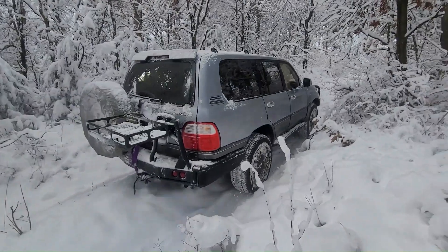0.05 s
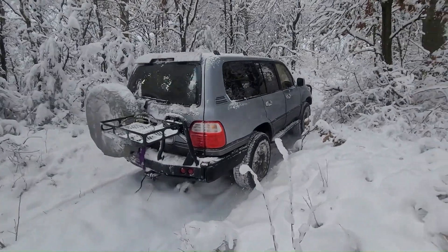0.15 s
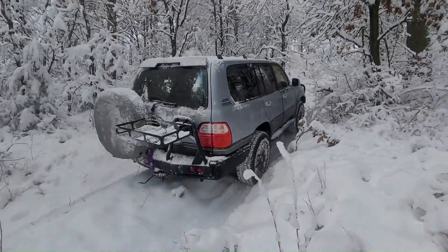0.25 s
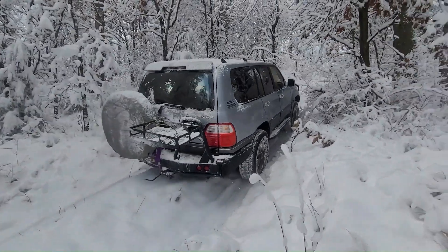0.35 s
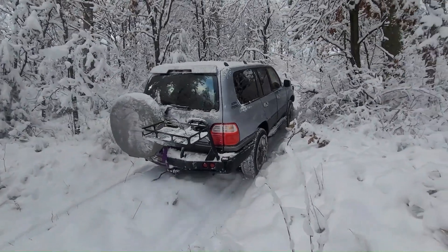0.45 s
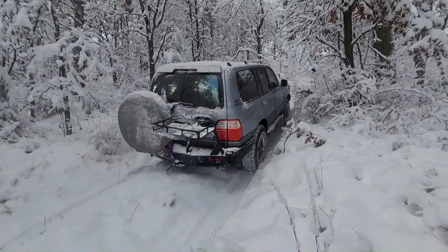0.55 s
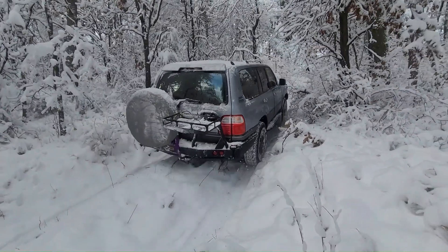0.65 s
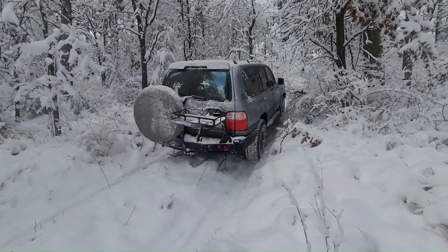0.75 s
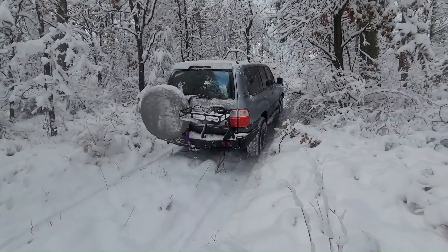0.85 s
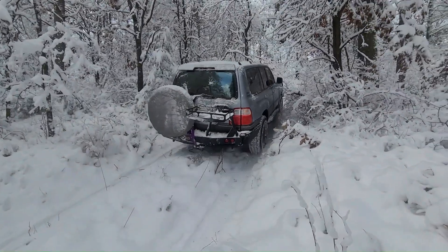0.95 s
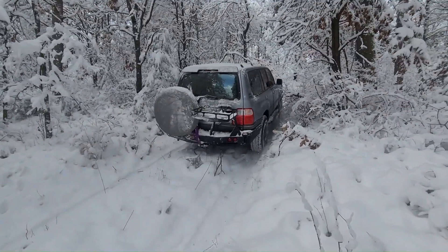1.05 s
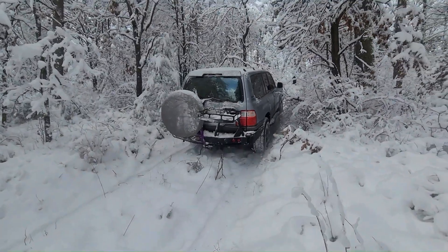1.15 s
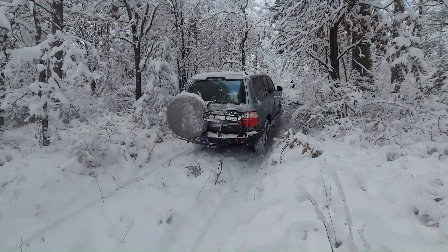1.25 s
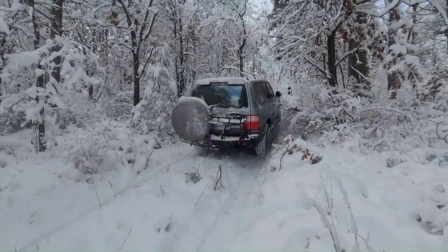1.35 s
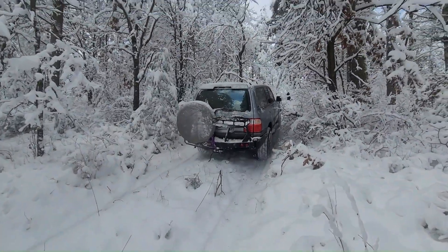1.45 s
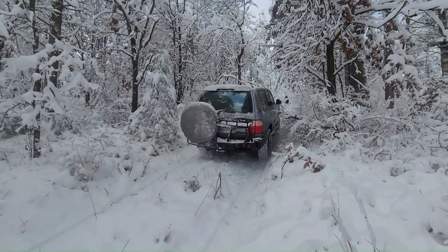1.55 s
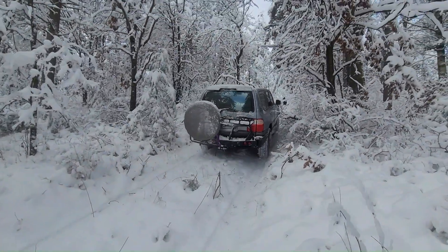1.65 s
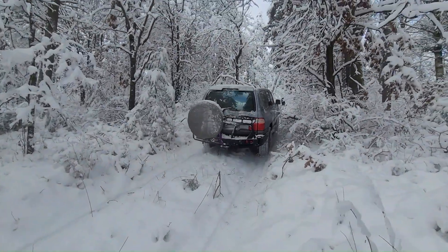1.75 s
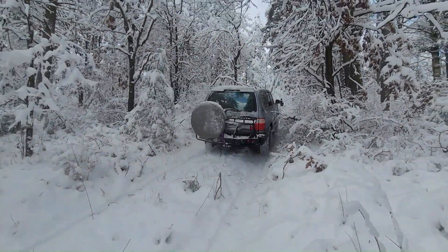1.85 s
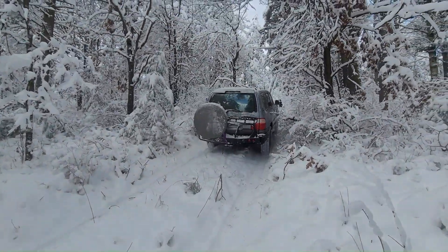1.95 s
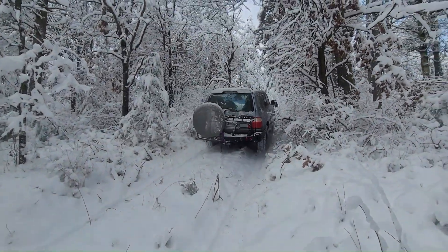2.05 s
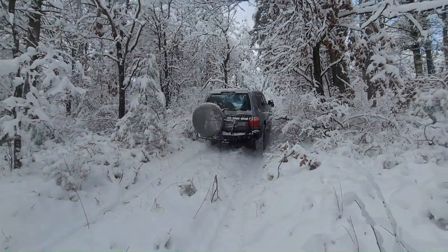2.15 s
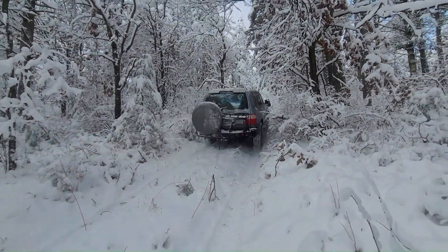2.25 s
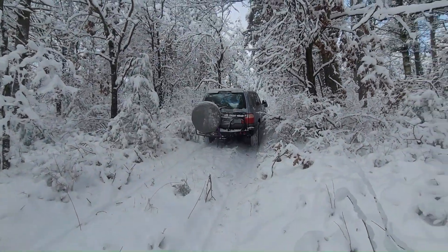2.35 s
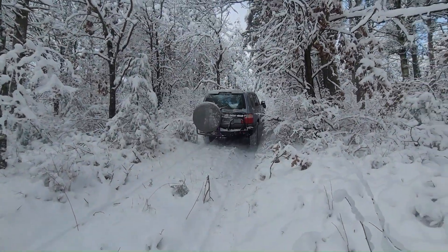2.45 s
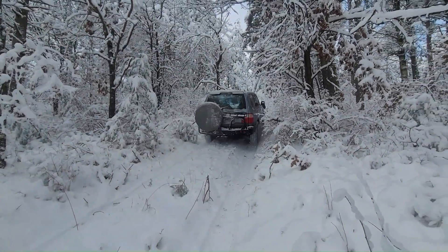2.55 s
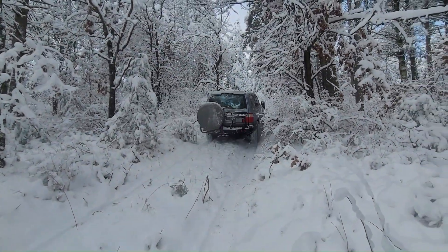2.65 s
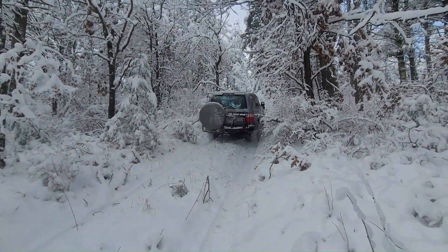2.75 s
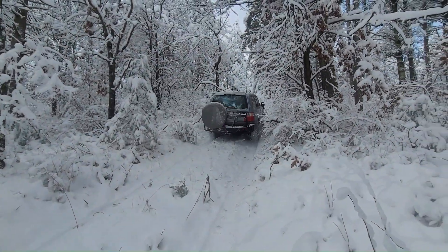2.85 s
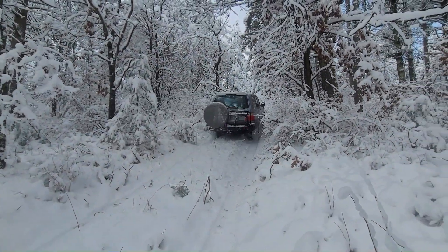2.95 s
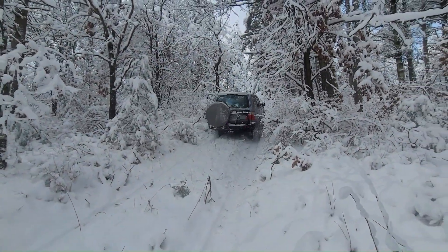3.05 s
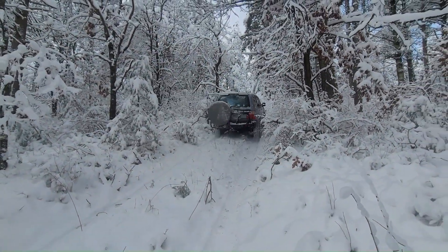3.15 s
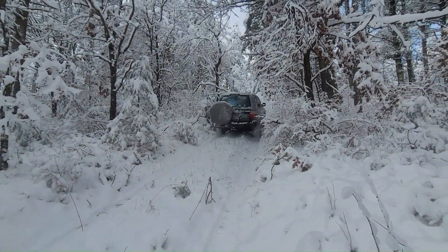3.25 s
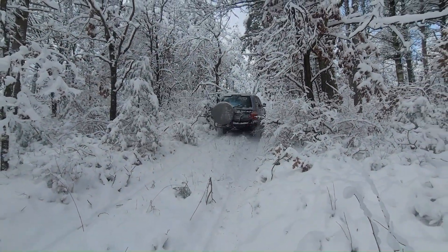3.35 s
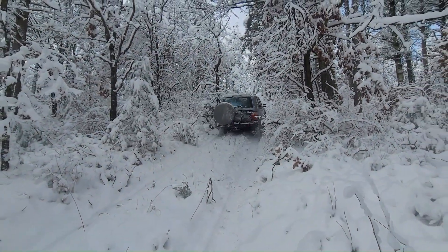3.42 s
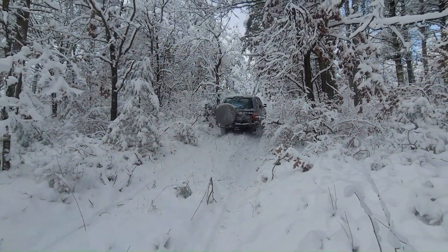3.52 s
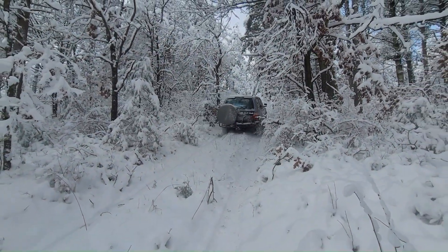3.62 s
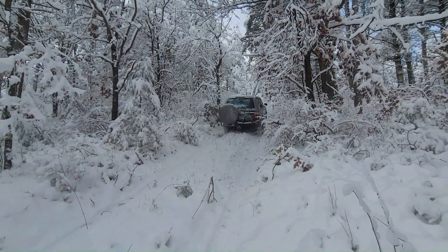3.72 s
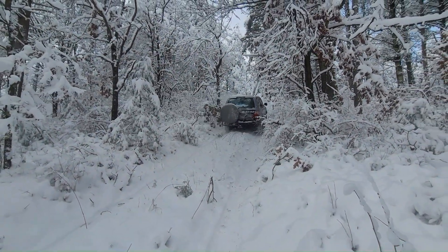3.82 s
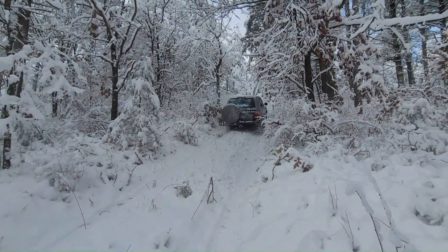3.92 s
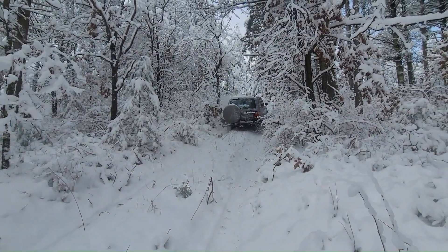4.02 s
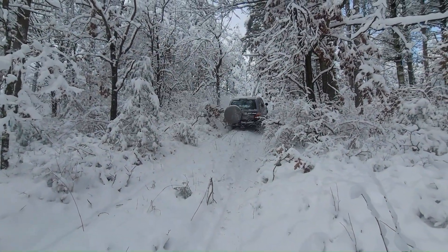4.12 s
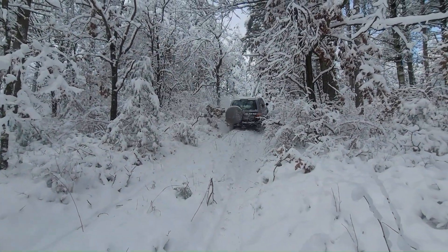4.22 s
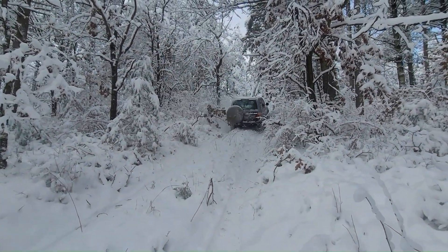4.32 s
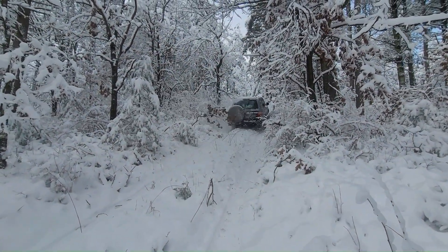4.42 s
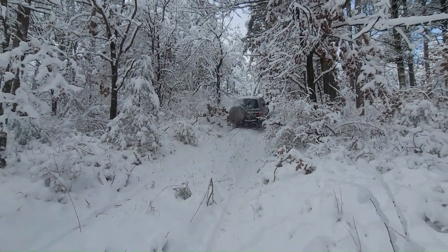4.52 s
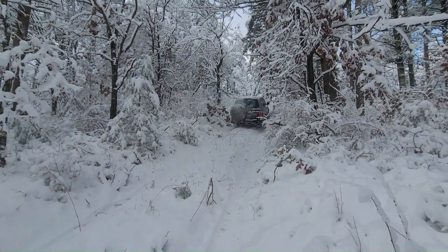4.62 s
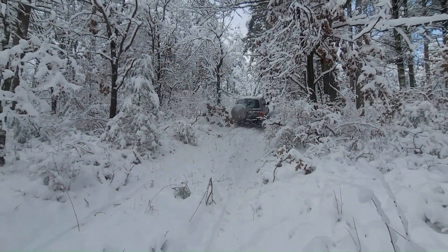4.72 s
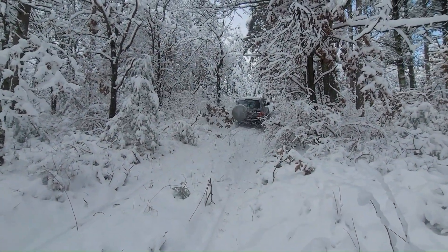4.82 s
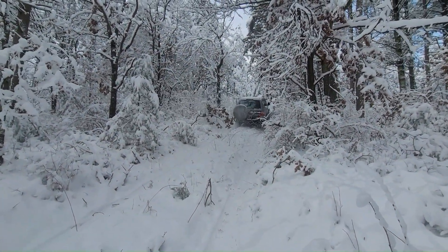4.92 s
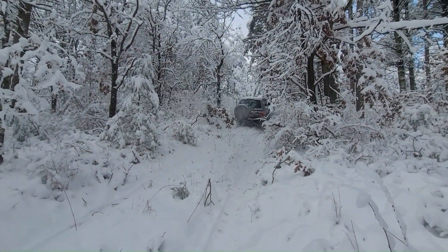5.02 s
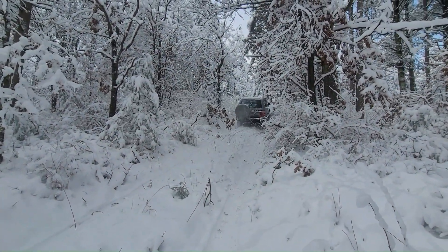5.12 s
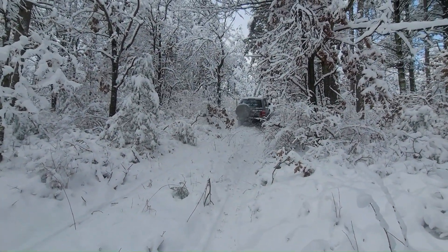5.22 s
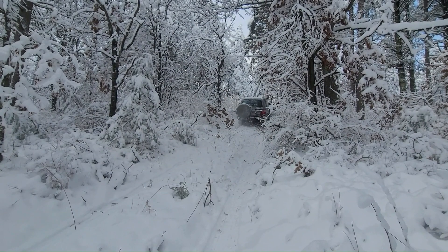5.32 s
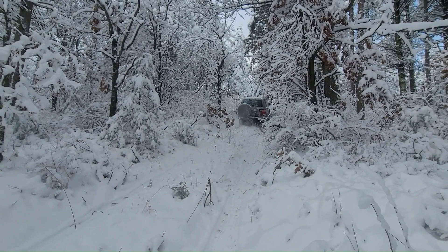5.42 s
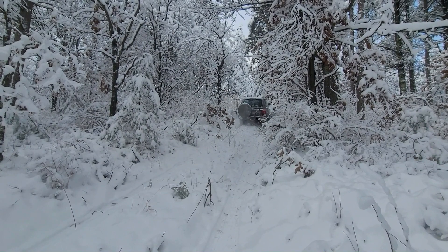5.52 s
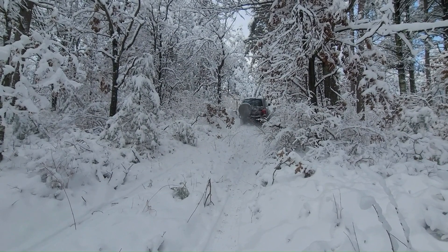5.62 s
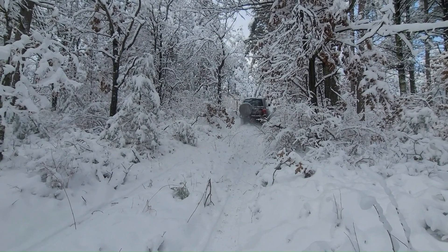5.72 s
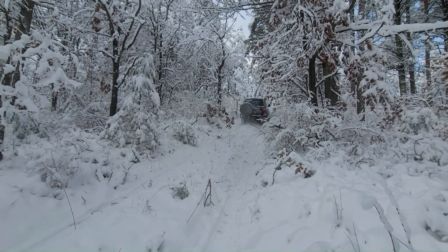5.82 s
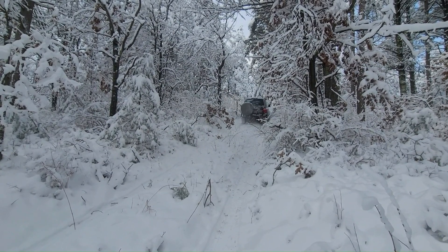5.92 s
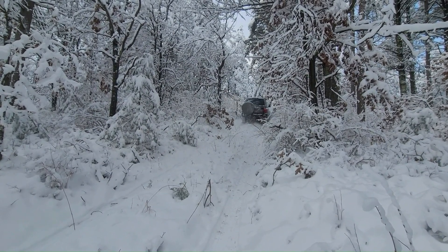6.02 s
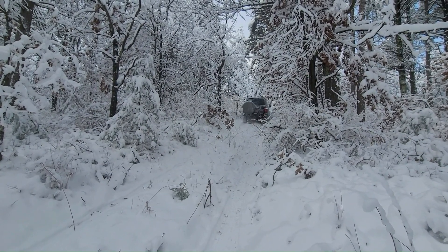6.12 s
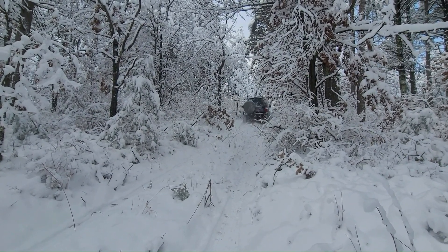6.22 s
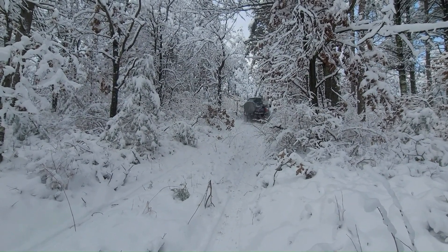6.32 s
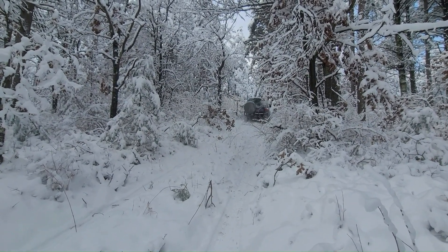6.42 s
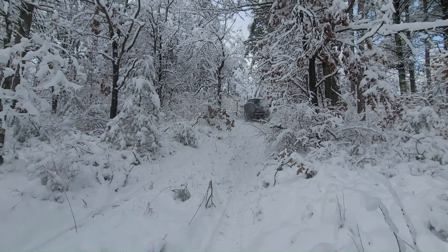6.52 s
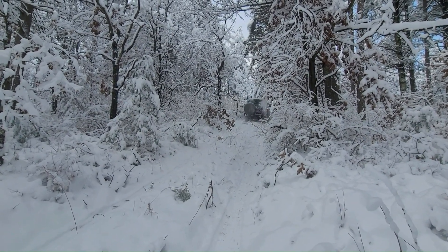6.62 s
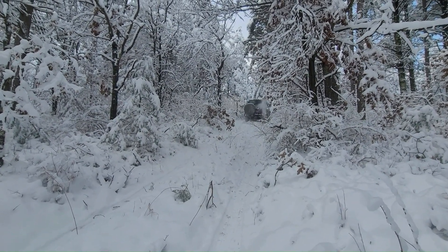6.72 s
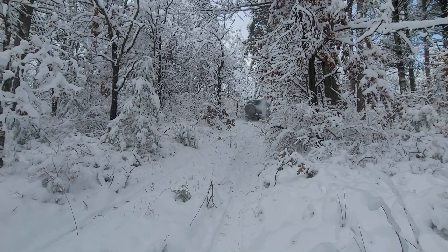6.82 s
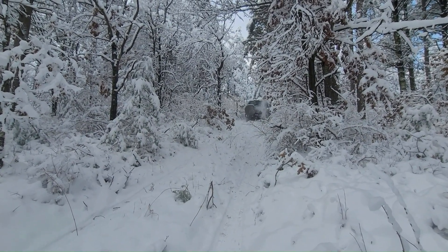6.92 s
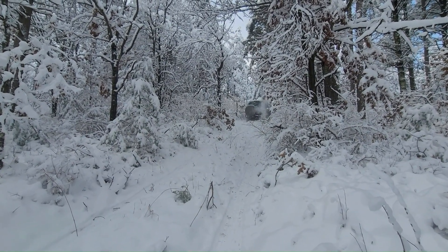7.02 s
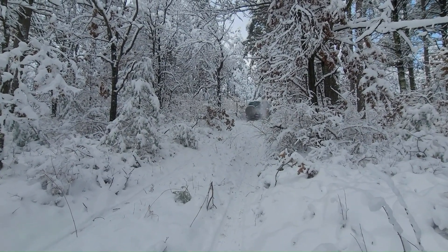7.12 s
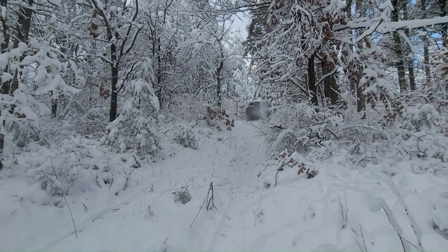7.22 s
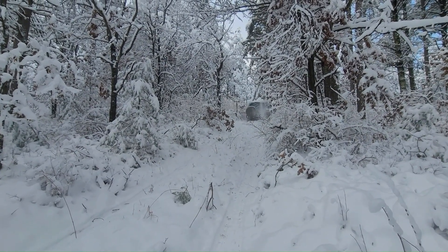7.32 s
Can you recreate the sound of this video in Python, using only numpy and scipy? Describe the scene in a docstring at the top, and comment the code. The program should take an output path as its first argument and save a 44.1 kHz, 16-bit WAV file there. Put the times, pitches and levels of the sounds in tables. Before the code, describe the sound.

A heavy truck crawls away along a snowy forest trail, its steady low exhaust drone beneath dull packing, gritty crunching and cold squeaks of snow. Twigs snap and branches crack, a limb breaks at mid-distance, suspension clunks, and one very sharp snap stands out. Later, cloth rustles close to the outdoor stereo microphone; the tyre noise drops abruptly, leaving a weak, wavering engine and faint wood knocks.

```python
"""A V8 truck crawls away along a snowy forest trail at about 1500 rpm, its exhaust droning in sine lines. Close
by at first, its tyres pack and crunch the snow: coloured noise gated by many tiny fractures. Branches, a limb,
a stick and twigs break as noise bursts and ringing modes, echoed by the trunks. From 4.25 s cloth rustles close
to the microphone; at 5.55 s the tyre noise drops abruptly and then fades, and the drone grows weak and
wavering."""
import sys
import numpy as np
from scipy import signal
from scipy.fft import rfft, irfft, next_fast_len
from scipy.io import wavfile

SR = 44100
rng = np.random.default_rng(int(sys.argv[2]) if len(sys.argv) > 2 else 0)


def wrap_up_sound(samples):
    """Save the sound to the file named by the first command line argument, as 16-bit audio."""
    columns = np.atleast_2d(samples).T
    # keep every value between -1 and 1, then stretch to whole-number steps
    tamed = np.clip(columns, -1, 1)
    steps = np.round(tamed * 32767).astype(np.int16)
    wavfile.write(sys.argv[1], SR, steps)


N = 325040
TIME = np.arange(N) / SR

# Event and colour levels are relative: the functions below add their own offsets.
# engine speed: (t/s, four-stroke cycles per s)
SPEED = [(0, 11.66), (0.8, 11.91), (1.25, 12.43), (2.6, 12.46), (3.85, 12.3), (4.15, 12.45), (4.45, 12.18),
         (5.1, 12.42), (5.7, 13.02), (7.37, 13.12)]
# exhaust drone, 5th multiple of the cycle rate: (t/s, level/dB)
DRONE = [(0, -43), (0.5, -42), (0.9, -46), (1.75, -46), (2.15, -37.5), (3.85, -36.5), (4.15, -39),
         (5.5, -42), (5.6, -45), (6.1, -49.5), (7.37, -51.5)]
# firing line, 8th multiple, swelling with each push on the throttle: (t/s, level/dB)
FIRING = [(0, -62), (0.3, -47.5), (0.98, -40.5), (1.8, -46.5), (2.4, -36), (3.4, -41), (4.15, -43),
          (4.75, -38.5), (5.7, -52.5), (7.37, -59.5)]
# weaker exhaust lines: (multiple of the cycle rate, level/dB against their shared level)
OVERTONES = [(4, -3), (6, -6.5), (11, -4), (13, -14), (16, -10), (19, -16.5)]
# shared level of the weaker lines: (t/s, level/dB)
OVERTONE_LEVEL = [(0, -52.5), (0.9, -48.5), (1.35, -44), (2, -51.5), (3.2, -53), (3.8, -47.5), (4.5, -46.5),
                  (5.45, -48.5), (5.7, -69), (7.37, -85)]
# rumble swelling as the truck heaves over bumps: (t/s, rise/s, fall/s, level/dB)
BUMPS = [(1.31, .08, 0.18, -40), (2.05, 0.092, 0.092, -41), (2.98, 0.49, 0.11, -36.5),
         (3.84, 0.03, 0.029, -33.5), (5.35, 0.022, 0.14, -32.5), (7.24, 0.081, 0.055, -49)]
# suspension clunks in the ruts: (t/s, level/dB)
CLUNKS = [(2.519, -32), (3.0825, -32.5), (3.185, -31.5), (3.211, -36), (3.5355, -28.5), (4.49, -37)]
# modes of the axle: (f/Hz, level/dB, t60/s)
AXLE_MODES = [(462, -6, 0.024), (700, -0.5, 0.02), (1210, -17, 0.012)]
# rolling tyres, bogging in and then receding: (t/s, level/dB)
TYRES = [(0, -0.5), (0.5, -1), (1, 0.5), (2.55, -0.5), (3.3, -3), (4, -7), (4.8, -9), (5.5, -9.5)]
# drive train labouring, up the slope and then in short pushes: (t/s, rise/s, fall/s, level/dB)
PUSHES = [(2.56, 0.13, 0.78, -42), (3.56, .03, 0.14, -45), (4.11, 0.021, 0.036, -58),
          (4.36, 0.12, 0.032, -47)]
# swells of crunching and rustling: (t/s, rise/s, fall/s, crunch level/dB, crackle level/dB, powder level/dB)
SWELLS = [(0.73, 0.074, 0.17, -49, -52.5, -63), (1.03, 0.13, 0.53, -48, -52, -65),
          (2.66, 0.025, 0.029, -45, -70, -75), (2.85, 0.23, 0.08, -80, -59, -56.5),
          (3.53, 0.19, 0.21, -68.5, -68, -67), (4.1, 0.099, 0.14, -58.5, -62, -85),
          (4.46, 0.028, 0.16, -55, -60.5, -62.5), (4.89, 0.018, 0.05, -46.5, -58.5, -59),
          (5.05, 0.082, 0.092, -48.5, -56, -56.5), (5.535, 0.31, 0.012, -53, -67, -69),
          (6.04, 0.043, 0.077, -63.5, -62, -78), (6.12, 0.05, 0.1, -57, -56.5, -63.5),
          (6.48, 0.06, 0.087, -61, -60.5, -67), (6.75, 0.34, 0.2, -72, -75, -76)]
# packed snow collapsing: (t/s, level/dB, centre f/Hz, t60/s)
THUDS = [(1.27, -39, 684, 0.14), (2.115, -35, 353, 0.2), (2.565, -33.5, 435, 0.16),
         (3.905, -45.5, 830, .24), (4.11, -43.5, 425, 0.19), (4.355, -43, 390, 0.15),
         (6.279, -55, 517, 0.18), (6.339, -49.5, 584, 0.078)]
# single creaks of snow and bending wood: (t/s, level/dB, centre f/Hz, t60/s)
CREAKS = [(0.815, -46, 2380, 0.35), (1.2, -32, 2080, 0.015), (1.4986, -44.5, 3520, 0.13),
          (1.577, -39.5, 3020, 0.05), (1.952, -43, 1950, 0.032), (2.119, -46, 2300, 0.34),
          (2.382, -46, 3900, 0.14), (3.1, -41.5, 2040, 0.022), (3.583, -47.5, 1500, 0.041),
          (6.2455, -48.5, 1600, 0.098), (6.248, -49, 2200, 0.1), (6.2735, -49, 2150, .04),
          (6.33, -52.5, 2350, 0.06)]
# branches and crust breaking:
# (t/s, level/dB, low ring level/dB, splinter level/dB, low ring f/Hz, high ring f/Hz, left-right level/dB)
CRACKS = [(0.3571, -37, 0, -24, 850, 2230, -10), (0.5606, -38, -10, -15, 725, 2170, -4),
          (0.645, -42, 8, -26.5, 1040, 1500, -7), (0.6652, -44, 8, 0, 1255, 2310, -6),
          (0.8594, -35.5, 4, -5, 700, 2377, -1), (1.7269, -34, -2.5, -15, 855, 2780, -7),
          (1.7645, -30.5, 7.5, -13, 865, 2663, -3), (2.263, -33, -9, -22, 604, 1605, -4),
          (2.2822, -32, 7.5, -4, 785, 1500, -1), (2.3844, -39.5, 7, -17, 587, 1553, -5),
          (3.473, -24, -9, -9, 1360, 3200, 1.5), (4.113, -46.5, 14, -13, 807, 2370, -5),
          (5.0564, -42, -3, -11, 820, 2110, -10), (6.4794, -44, -4.5, -1, 794, 2630, -7)]
# modes of a branch: (ratio to its high ring, level/dB)
BRANCH_MODES = [(0.757, -15), (1, 3), (1.327, -4.5), (1.758, -19.5), (2.098, -3)]
# a thick limb giving way under a wheel: (t/s, level/dB, brightest f/Hz, rise/s, left-right level/dB)
LIMB_JERKS = [(2.2805, -34, 7000, 0.0031, -8), (2.288, -32, 2200, 0.0044, -4),
              (2.299, -28, 850, 0.0014, 17.5), (2.311, -38.5, 3500, 0.0018, -5),
              (2.328, -37.5, 1400, 0.004, 1)]
# modes of the limb: (f/Hz, level/dB, t60/s)
LIMB_MODES = [(615, -2, 0.1), (750, -2.5, 0.06), (935, -6, 0.15), (1472, -3, 0.055), (1736, 0, .065),
              (1845, 0, 0.05), (2240, -8, 0.087), (2740, -7, .05), (2985, -6, 0.049), (3300, -7, 0.045),
              (3707, -2.5, 0.1)]
# a dry stick breaking: (t/s, level/dB, brightest f/Hz, rise/s, left-right level/dB)
STICK_JERKS = [(3.3445, -34.5, 5000, 0.0024, -3), (3.3555, -37, 1200, .002, -4)]
# modes of the stick: (f/Hz, level/dB, t60/s)
STICK_MODES = [(860, -3, .04), (1067, -0.5, 0.073), (1357, -12, 0.032), (1640, 1.5, 0.055), (2525, -7, .04),
               (2960, -3.5, 0.038), (4178, -12, 0.073)]
# twigs and ice snapping, and the bright top of the last log knock: (t/s, level/dB, nominal f/Hz, t60/s)
SNAPS = [(0.151, -33, 9160, 0.027), (0.3711, -31.5, 7900, 0.018), (0.7706, -27, 6940, 0.018),
         (0.873, -29.5, 6400, 0.11), (1.0246, -30.5, 14000, 0.032), (2.4738, -34.5, 10100, 0.094),
         (2.9516, -29.5, 6320, 0.016), (3.0121, -36.5, 9930, 0.11), (3.2321, -35, 5940, 0.1),
         (3.345, -31.5, 6940, .06), (3.473, -14, 4600, 0.014), (3.4735, -31, 12740, .02),
         (3.4995, -34, 6000, 0.032), (3.5073, -29.5, 9000, 0.014), (3.586, -35, 9000, 0.038),
         (3.686, -23, 8900, 0.013), (4.865, -30, 10800, 0.05), (4.9416, -35.5, 13000, 0.032),
         (5.0352, -28.5, 11000, 0.061), (7.331, -52, 4900, .15)]
# logs knocking against the truck up the trail: (t/s, level/dB, brightest f/Hz, rise/s, left-right level/dB)
KNOCKS = [(4.863, -40.5, 2700, 0.0013, -9), (4.8705, -39, 1780, 0.00087, -9),
          (5.047, -47, 3000, 0.001, -11), (5.072, -53, 3970, 0.00091, -12),
          (5.5325, -47.5, 2800, 0.00091, -6), (6.274, -55, 2660, 0.00091, -9),
          (6.315, -57, 3570, 0.004, -9), (6.3235, -55.5, 3000, 0.0012, -6),
          (7.3292, -36, 2210, 0.00077, -7), (7.3445, -45, 1100, .001, -4.5), (7.355, -51, 2500, .001, -1)]
# modes of the logs: (f/Hz, level/dB, t60/s)
LOG_MODES = [(750, -2.5, 0.028), (945, -4.5, 0.024), (1245, -3, 0.034), (1702, -3, 0.04),
             (2200, -3.5, 0.04), (2500, -4, .03)]
# spectrum of the exhaust rumble: (f/Hz, relative level/dB)
RUMBLE_COLOUR = [(18, -25), (28, -12), (38, -21), (56, -2), (78, -7), (105, -10.5), (135, -19),
                 (200, -34.5)]
# spectrum of snow packed by the tread: (f/Hz, relative level/dB)
PACKING_COLOUR = [(90, 1), (140, -1.5), (220, -1), (320, -0.5), (430, -5.5), (650, -48)]
# spectrum of the drive train's whir: (f/Hz, relative level/dB)
WHIR_COLOUR = [(300, -12.5), (450, -1), (580, 1), (750, -0.5), (900, -7), (1100, -13.5), (1400, -32),
               (1900, -18.5)]
# spectrum of breaking crust: (f/Hz, relative level/dB)
CRUNCH_COLOUR = [(900, 5), (1250, 4.5), (1600, 0.5), (2300, -0.5), (3100, -4), (3700, -11), (4400, -9)]
# spectrum of ice crackle: (f/Hz, relative level/dB)
CRACKLE_COLOUR = [(3500, 12.5), (4500, 2), (5400, 4.5), (7300, 0.5), (8800, 5.5), (10500, 3)]
# spectrum of sifting powder: (f/Hz, relative level/dB)
POWDER_COLOUR = [(10000, 1.5), (12000, 3.5), (14000, 2), (15800, 2), (17000, -30)]
# spectrum of cloth near the microphone: (f/Hz, relative level/dB)
CLOTH_COLOUR = [(3700, 5.5), (5300, 8), (6700, 0), (8100, 2), (8900, -0.5), (10500, 7.5)]
# diffuse sound at the two microphone ports: (f/Hz, left-right likeness, clipped to -1..1)
LIKENESS = [(30, 0.5), (60, 0.9), (150, 1.8), (300, 0.77), (700, 0.48), (1300, -0.25), (2200, -0.16),
            (4000, -0.16), (14000, 0)]
# diffuse sound at the two microphone ports: (f/Hz, left-right level/dB)
BALANCE = [(30, -2), (100, 3), (600, -2.5), (1300, -5), (2400, -5), (4400, -1.5), (8000, -4), (14000, 1)]

# the 3rd multiple against the drone, and how much lower it starts
THIRD_DB, THIRD_START_DB, THIRD_GROW_S = -3, -13, 1.0
# rumble: early level, change and throb after the drop
RUMBLE_DB, RUMBLE_LATE_DB, RUMBLE_SINK_S, RUMBLE_THROB_DB = -46.5, -9, 0.64, 3.5
# layers that follow the tyres, before the tyres' own level
PACKING_DB, WHIR_DB, CRUNCH_DB, CRACKLE_DB, POWDER_DB = -42, -44, -50, -59.5, -66
PACKING_START_DB, PACKING_GROW_S = -5.5, 0.63  # the packing builds up as the tyres dig in
PACKING_DROP_DB = -3.5  # extra loss of the dull packing after the drop
WHIR_FOLLOWS, TREBLE_FOLLOWS = 0.98, 0.69  # share of the tyres' swing in whir, and in crackle and powder
CRUNCH_LUMPS_DB, CRUNCH_LUMPS_HZ = 1.5, 13.3  # the crust gives way unevenly
DROP_S, DROP_LENGTH_S, DROP_DB, FADE_DB_PER_S = 5.548, 0.006, -11, -3  # abrupt drop, then a steady fade
CRUST_FROM_S, CRUST_LASTS_S, CRUST_T60_S = 0.55, 1.65, 0.031
CRUST_DB, CRUST_SPREAD_DB, CRUST_PAN_DB = -53, 7, -6
CRUST_LOW_HZ, CRUST_OCTAVES, CRUST_DULL_DB = 1284, 2.08, 6  # the highest are this much weaker
CREAK_WIDTH, CREAK_RISE_S, CREAK_PAN_DB = 1.105, 0.0021, -8  # width: band edge as a ratio to the centre
CRACK_RISE_S, CRACK_CYCLES = 0.0042, 56  # lasts a set number of low-ring cycles: thick wood rings longer
SMALL_SNAPS_UNTIL_S, SMALL_SNAP_DB, SMALL_SNAP_DB_PER_S = 0.75, -37.5, -4
SMALL_SNAP_HZ, SMALL_SNAP_T60_S, SNAP_PAN_DB = 9800, 0.024, -2.5
KNOCK_ECHO_DB = 4  # from that far, more of the sound comes by way of the trunks
FOREST_T60_S, FOREST_DB, FOREST_CUT_HZ = 0.12, -15.5, 15000
CUTOFF_HZ = 16100


def from_db(db):
    """Decibels to gain."""
    return 10 ** (np.asarray(db) / 20)


def power_sum(*levels_db):
    """Level in dB of unrelated sounds heard together."""
    return 10 * np.log10(sum(from_db(db) ** 2 for db in levels_db) + 1e-20)


def rms_one(x):
    """Scale to rms 1."""
    return x / np.sqrt(np.mean(x ** 2) + 1e-20)


def in_time(rows):
    """Read a table along time, one curve per column after the first."""
    s, *columns = np.transpose(rows)
    return [np.interp(TIME, s, column) for column in columns]


def at_hz(points, hz):
    """Read a table on a log-frequency axis."""
    f, value = np.transpose(points)
    return np.interp(np.log(hz + 1e-3), np.log(f), value)


def panned(db):
    """Left and right gains for a level difference."""
    return from_db(np.array([[0.5], [-0.5]]) * db)


def add(out, s, sound):
    """Mix a sound in at time s."""
    start = int(np.clip(s * SR, 0, N - 1))
    out[:, start:start + sound.shape[1]] += sound[:, :N - start]


def drift(rate_hz):
    """Slow chance with spread 1: noise at a 40th of the sample rate through two equal poles."""
    pole = np.exp(-80 * np.pi * rate_hz / SR)
    noise = rng.standard_normal(N // 40 + 2002)
    slow = signal.lfilter([1], [1, -2 * pole, pole * pole], noise)[2000:]  # skip the filter's start
    return np.interp(np.arange(N) / 40, np.arange(len(slow)), rms_one(slow))


def surges(rows):
    """Level in dB of events that grow and die exponentially about their peak; one curve per level column."""
    events = []
    for s, rise_s, fall_s, *peaks_db in rows:
        away = np.maximum((s - TIME) / max(rise_s, 0.005), (TIME - s) / max(fall_s, 0.005))
        events.append(np.array(peaks_db)[:, None] - 20 / np.log(10) * np.minimum(away, 20))
    return power_sum(*events)


def since_drop():
    """Seconds since the abrupt drop, zero before."""
    return np.maximum(TIME - DROP_S, 0)


def band(x, low_hz, high_hz, order=2):
    """Causal band-pass."""
    edges = np.clip([low_hz, high_hz], [10, 20], [0.44 * SR, 0.45 * SR])
    return signal.sosfilt(signal.butter(order, edges, "band", fs=SR, output="sos"), x)


def stereo_noise(colour, envelope=1):
    """Noise under an envelope, then coloured and spread over both ports; rms 1."""
    size = next_fast_len(N)
    hz = np.arange(size // 2 + 1) * SR / size
    mid, side = rfft(rng.standard_normal((2, N)) * envelope, size)
    alike = np.clip(at_hz(LIKENESS, hz), -1, 1)
    pair = np.sqrt(1 + alike) * mid + np.sqrt(1 - alike) * side * [[1], [-1]]
    # outside its table the colour falls steeply
    skirts = 1 / (1 + (colour[0][0] / (hz + 1)) ** 4) / (1 + (hz / colour[-1][0]) ** 8)
    spectrum = pair * skirts * from_db(at_hz(colour, hz)) * panned(at_hz(BALANCE, hz))
    return rms_one(irfft(spectrum, size)[:, :N])


def grains(per_s, spread_db, t60, smooth_share):
    """Envelope of many tiny fractures of uneven size, each dying quickly, over a smooth bed."""
    born = rng.random(N) < per_s * from_db(4 * drift(7)) / SR
    energy = born * from_db(spread_db * np.minimum(rng.exponential(1, N), 4)) ** 2
    energy = signal.lfilter([1], [1, -from_db(-120 / (t60 * SR))], energy + 1e-18)
    share = np.clip(smooth_share, 0, 1)
    return np.sqrt(share + (1 - share) * energy / energy.mean())


def swell(t60, rise_s):
    """Envelope of height 1: fibres give way one after another, then the sound dies."""
    t = TIME[:SR // 4]
    shape = (1 - np.exp(-t / max(rise_s, 1e-4))) ** 2 * from_db(-60 * t / max(t60, 0.005))
    return shape / shape.max()


def burst(low_hz, high_hz, t60, rise_s, apart=0.87):
    """A quarter second of noise in one band that swells and dies, partly alike at the two ports."""
    noise = rng.standard_normal((2, SR // 4 + 2000))
    mid, side = band(noise, low_hz, high_hz)[:, 2000:]  # skip the filter's start
    return rms_one(mid + apart * side * [[1], [-1]]) * swell(t60, rise_s)


def ring(hz, t60, rise_s, rough):
    """A struck mode, roughened by noise about its pitch as by tearing fibres."""
    phase = rng.random() + rng.random((2, 1)) / 3  # in cycles, a little apart at the two ports
    tone = np.sin(2 * np.pi * (hz * TIME[:SR // 4] + phase)) * swell(t60, rise_s)
    return tone + rough * burst(hz / 1.257, hz * 1.083, t60, rise_s)


def tearing():
    """Gain of fibres that part one by one, a few milliseconds apart, each with a sharp edge."""
    parts = rng.random(SR // 4) < 450 / SR
    return rms_one(0.5 + 2 * signal.lfilter([1], [1, -0.98], parts))


def exhaust(wobble_db, overtone_wobble_db):
    """Uneven firing of each cylinder bank puts lines at 3 and 5 times the cycle rate, beside the firing line."""
    cycle_hz, = in_time(SPEED)
    fifth_db, = in_time(DRONE)
    firing_db, = in_time(FIRING)
    overtone_db, = in_time(OVERTONE_LEVEL)
    third_db = fifth_db + THIRD_DB + THIRD_START_DB * np.exp(-TIME / THIRD_GROW_S)
    turns = np.cumsum(cycle_hz * (1 + 0.001 * drift(4))) / SR
    far = np.clip((TIME - 5.3) / 0.46, 0, 1)
    out = 0
    for multiple, db in zip((3, 5, 8), (third_db, fifth_db, firing_db)):
        # from 5.3 s the lines grow weaker and waver more
        waver_db = wobble_db * drift(4.1) + far * (3.7 * drift(12.6) - 2)
        out = out + from_db(db + waver_db) * np.sin(2 * np.pi * (multiple * turns + rng.random()))
    for multiple, db in OVERTONES:
        level = from_db(overtone_db + db + overtone_wobble_db * drift(3.5))
        out = out + level * np.sin(2 * np.pi * (multiple * turns + rng.random()))
    return np.sqrt(2) * out * panned(-2.07)


def rumble():
    """Low exhaust noise that swells over bumps, then sinks and throbs after the drop."""
    far = 1 - np.exp(-since_drop() / RUMBLE_SINK_S)
    steady_db = RUMBLE_DB + far * (RUMBLE_LATE_DB + RUMBLE_THROB_DB * drift(11.0))
    return from_db(power_sum(steady_db, surges(BUMPS))) * stereo_noise(RUMBLE_COLOUR)


def suspension(rise_s, rough):
    """The axle drops into a rut and its modes ring in a short hollow clunk."""
    out = np.zeros((2, N))
    for s, db in CLUNKS:
        clunk = sum(from_db(db + mode_db) * ring(hz, t60, rise_s, rough) for hz, mode_db, t60 in AXLE_MODES)
        add(out, s, clunk)
    return out


def rolling_levels():
    """Packing, whir, crunch, crackle and powder in dB: all follow the tyres, with pushes and swells on top."""
    tyres_db, = in_time(TYRES)
    dropped = np.minimum(since_drop() / DROP_LENGTH_S, 1)
    tyres_db = tyres_db + DROP_DB * dropped + FADE_DB_PER_S * since_drop()
    lumps_db = CRUNCH_LUMPS_DB * drift(CRUNCH_LUMPS_HZ) * (1 - dropped)
    crunch_db, crackle_db, powder_db = surges(SWELLS)
    dig_in_db = PACKING_START_DB * np.exp(-TIME / PACKING_GROW_S)
    return (PACKING_DB + tyres_db + dig_in_db + PACKING_DROP_DB * dropped,
            power_sum(WHIR_DB + WHIR_FOLLOWS * tyres_db, surges(PUSHES)),
            power_sum(CRUNCH_DB + tyres_db + lumps_db, crunch_db),
            power_sum(CRACKLE_DB + TREBLE_FOLLOWS * tyres_db + lumps_db, crackle_db),
            power_sum(POWDER_DB + TREBLE_FOLLOWS * tyres_db, powder_db))


def rolling(packing_db, whir_db, crunch_db):
    """Tread blocks squeeze the snow in dull thuds and break its crust in grains; the drive train whirs."""
    packing = stereo_noise(PACKING_COLOUR, grains(per_s=130, spread_db=-1.0, t60=0.072, smooth_share=0.49))
    whir = stereo_noise(WHIR_COLOUR, grains(per_s=240, spread_db=4.0, t60=0.075, smooth_share=0.69))
    crunch = stereo_noise(CRUNCH_COLOUR, grains(per_s=200, spread_db=4.5, t60=0.0056, smooth_share=0.79))
    # single ice grains tick over the crunch
    ticks = stereo_noise(CRUNCH_COLOUR, grains(per_s=330, spread_db=2.5, t60=0.004, smooth_share=0))
    crust_noise = crunch + from_db(-6) * ticks
    return from_db(packing_db) * packing + from_db(whir_db) * whir + from_db(crunch_db) * crust_noise


def squeaks(count, spread_db, t60):
    """Cold snow creaks under the tread in many overlapping grains, each at another pitch."""
    out = np.zeros((2, N))
    for when, pitch, size in rng.random((count, 3)):
        hz = 950 * 3.7 ** pitch
        squeak = burst(hz / 1.06, hz * 1.06, t60, rise_s=0.004, apart=1)
        add(out, when * N / SR, from_db(spread_db * size - 5 * pitch) * squeak)
    return rms_one(out) * panned(-1.17) * from_db(-0.8 * TIME)


def crust(count):
    """Single fractures of the crust, many tiny and a few larger, thin out as the truck leaves."""
    out = np.zeros((2, N))
    for when, pitch, size in rng.random((count, 3)):
        s = CRUST_FROM_S + CRUST_LASTS_S * when ** 1.5
        hz = CRUST_LOW_HZ * 2 ** (CRUST_OCTAVES * pitch)
        db = CRUST_DB + CRUST_SPREAD_DB * size ** 2 - CRUST_DULL_DB * pitch
        add(out, s, from_db(db) * burst(hz / 1.14, hz * 1.14, CRUST_T60_S, rise_s=0.0012, apart=1))
    return out * panned(CRUST_PAN_DB)


def thuds(width, rise_s):
    """Packed snow collapses under a wheel with a dull bump of noise."""
    out = np.zeros((2, N))
    for s, db, hz, t60 in THUDS:
        add(out, s, from_db(db) * burst(hz / width, hz * width, t60, rise_s, apart=0.52))
    return out


def branches(soft_top_hz, hard_top_hz):
    """Each break is a spray of splinters and a woody crack over a low thud."""
    out = np.zeros((2, N))
    rise_s = CRACK_RISE_S
    for s, db, low_db, splinter_db, low_hz, high_hz, pan_db in CRACKS:
        t60 = CRACK_CYCLES / low_hz
        # a break muffled by snow throws few splinters and hardly stirs the upper modes
        top_hz = np.interp(splinter_db, [-20, -7], [soft_top_hz, hard_top_hz])
        modes = 0
        for ratio, mode_db in BRANCH_MODES:
            hz = ratio * high_hz
            modes = modes + from_db(mode_db) / (1 + (hz / top_hz) ** 6) * ring(hz, t60, rise_s, rough=0.87)
        crack = 0.87 * burst(1100, top_hz, t60, rise_s, apart=1.0) * tearing() + 0.53 * modes
        thud = burst(low_hz / 2.2, low_hz * 2.0, t60, rise_s)
        body = from_db(low_db) * (0.77 * ring(low_hz, t60, rise_s, rough=0.77) + 0.24 * thud)
        splinters = from_db(splinter_db) * burst(3700, 9800, t60, rise_s) * tearing()
        add(out, s - rise_s / 2, from_db(db - 5.5) * (crack + body + splinters) * panned(pan_db))
    return out


def struck_wood(blows, modes, rough):
    """Every blow or jerk rings the same modes; the lower its brightest pitch, the weaker the upper ones."""
    out = np.zeros((2, N))
    for s, db, top_hz, rise_s, pan_db in blows:
        rings = 0
        for hz, mode_db, t60 in modes:
            reached = from_db(mode_db) / (1 + (hz / top_hz) ** 4)
            rings = rings + reached * ring(hz, t60, rise_s, rough)
        add(out, s, from_db(db) * rings * panned(pan_db))
    return out


def twigs(count):
    """Thin frozen twigs give short bright snaps, and the last log knock a bright top: listed ones, and a
    scatter of small ones while near."""
    small = []
    for when, pitch in rng.random((count, 2)):
        s = SMALL_SNAPS_UNTIL_S * when
        db = SMALL_SNAP_DB + SMALL_SNAP_DB_PER_S * s  # fainter as the truck recedes
        small.append((s, db, SMALL_SNAP_HZ * 2 ** (pitch - 0.5), SMALL_SNAP_T60_S))
    out = np.zeros((2, N))
    for s, db, hz, t60 in list(SNAPS) + small:
        add(out, s, from_db(db - 8.0) * burst(hz / 1.76, hz * 1.5, t60, rise_s=0.00054, apart=0.94))
    return out * panned(SNAP_PAN_DB)


def creaks():
    """Now and then snow or bending wood creaks alone: a narrow burst of noise."""
    out = np.zeros((2, N))
    for s, db, hz, t60 in CREAKS:
        add(out, s, from_db(db) * burst(hz / CREAK_WIDTH, hz * CREAK_WIDTH, t60, CREAK_RISE_S, apart=0.69))
    return out * panned(CREAK_PAN_DB)


def crackle_and_cloth(crackle_db, powder_db, handover_s, lag_s):
    """Ice crackle gives way to cloth rustling nearby, right port first, while powder sifts down."""
    crackle = stereo_noise(CRACKLE_COLOUR, grains(per_s=110, spread_db=5.5, t60=0.023, smooth_share=0.76))
    powder = stereo_noise(POWDER_COLOUR, grains(per_s=100, spread_db=-6.0, t60=0.015, smooth_share=0.49))
    far, near = stereo_noise(CLOTH_COLOUR, grains(per_s=600, spread_db=3, t60=0.012, smooth_share=0.6))
    cloth = np.array([0.33 * np.interp(TIME - lag_s, TIME, near) + 0.6 * far, near])
    share = np.clip((TIME - handover_s) / 0.5, 0, 1)
    rustle = from_db(3.0) * np.sqrt(1 - share) * crackle + from_db(7.5) * np.sqrt(share) * cloth
    return from_db(crackle_db) * rustle + from_db(powder_db + 6.5) * powder * panned(-3 * share)


def forest(x):
    """Trunks scatter a thin, dull tail of sparse echoes that the snow soon swallows."""
    t = TIME[:SR // 2]
    echoes = rng.standard_normal((2, len(t))) * (rng.random((2, len(t))) < 1500 / SR)
    tail = band(echoes, 220, FOREST_CUT_HZ, order=1) * from_db(-60 * t / FOREST_T60_S) * (t > 0.012)
    tail /= np.sqrt(np.sum(tail ** 2, axis=1, keepdims=True))
    return from_db(FOREST_DB) * signal.fftconvolve(x, tail, axes=1)[:, :N]


def scene():
    """The truck, what it breaks, the rustle at the microphone and the echo off the trunks."""
    packing_db, whir_db, crunch_db, crackle_db, powder_db = rolling_levels()
    engine = rumble() + exhaust(wobble_db=0.55, overtone_wobble_db=2.3)
    clunks = suspension(rise_s=0.00068, rough=0.32)
    squeaking = from_db(crunch_db - 7) * squeaks(count=330, spread_db=7, t60=0.08)
    tyres = rolling(packing_db, whir_db, crunch_db) + squeaking
    tyres = tyres + crust(count=130) + thuds(width=1.31, rise_s=0.0026)
    limb = struck_wood(LIMB_JERKS, LIMB_MODES, rough=0.71)
    stick = struck_wood(STICK_JERKS, STICK_MODES, rough=0.62)
    knocks = struck_wood(KNOCKS, LOG_MODES, rough=0.58)
    breaks = branches(soft_top_hz=2700, hard_top_hz=5800) + limb + stick + twigs(count=6) + creaks()
    treble = crackle_and_cloth(crackle_db, powder_db, handover_s=4.25, lag_s=0.00008)
    echo = forest(breaks + from_db(KNOCK_ECHO_DB) * knocks)
    return engine + clunks + tyres + breaks + knocks + treble + echo


def record(dry):
    """The microphone's top is cut steeply by an elliptic low-pass."""
    return signal.sosfilt(signal.ellip(12, 0.1, 80, CUTOFF_HZ, fs=SR, output="sos"), dry)


dry = scene()
out = record(dry)
wrap_up_sound(out)
```